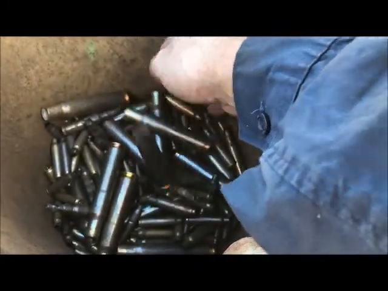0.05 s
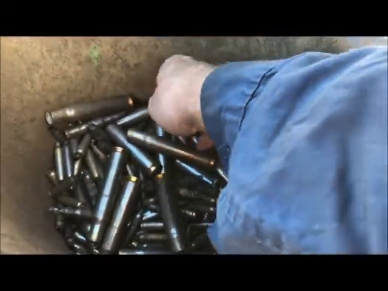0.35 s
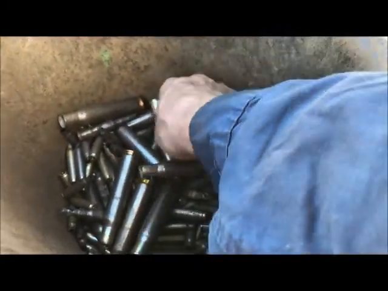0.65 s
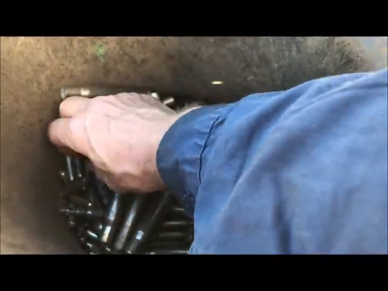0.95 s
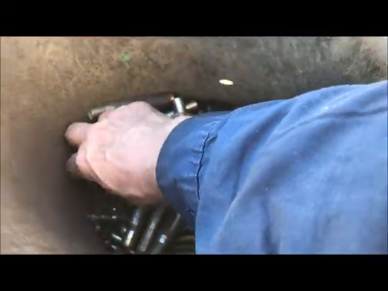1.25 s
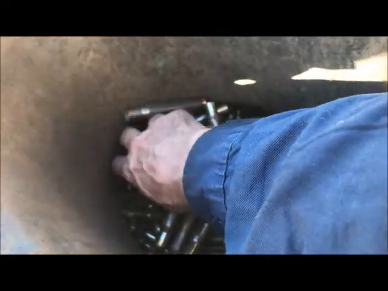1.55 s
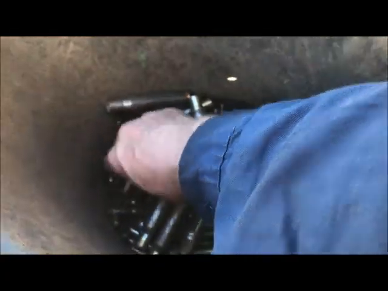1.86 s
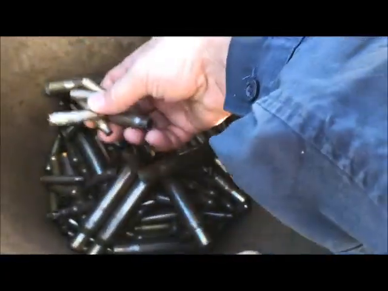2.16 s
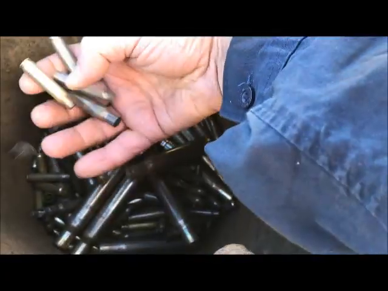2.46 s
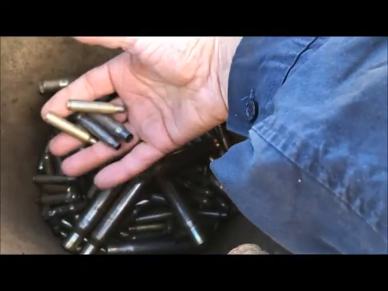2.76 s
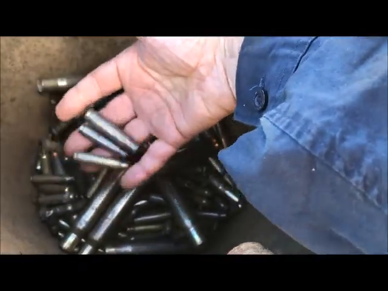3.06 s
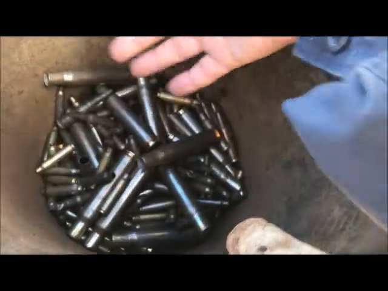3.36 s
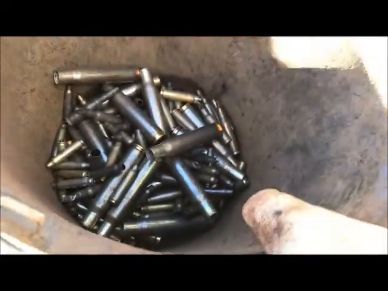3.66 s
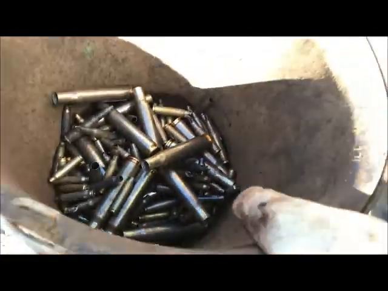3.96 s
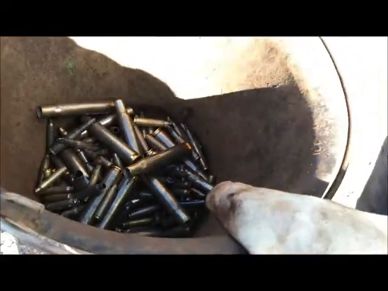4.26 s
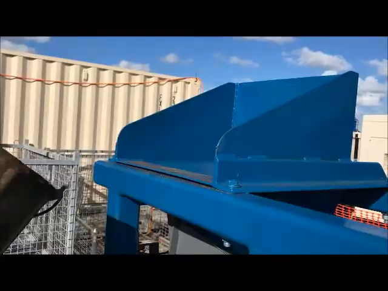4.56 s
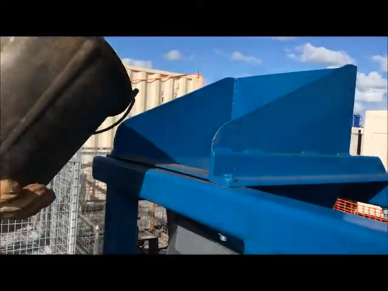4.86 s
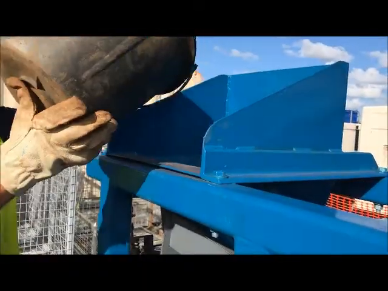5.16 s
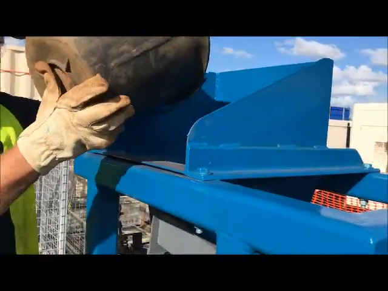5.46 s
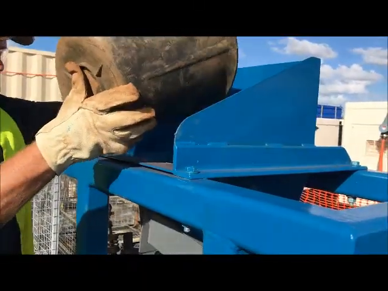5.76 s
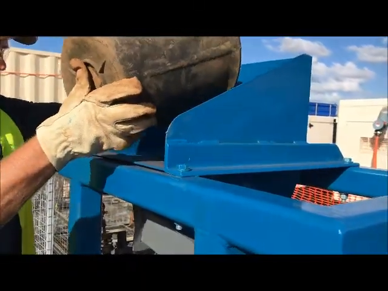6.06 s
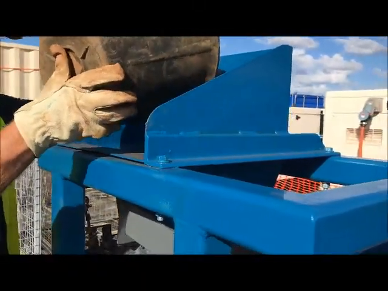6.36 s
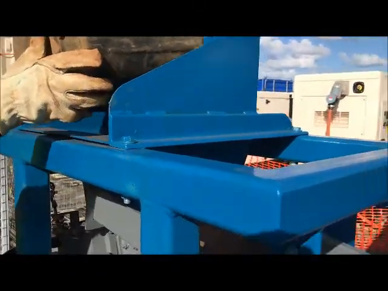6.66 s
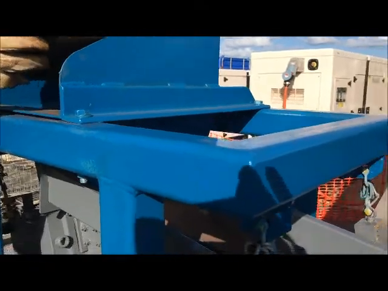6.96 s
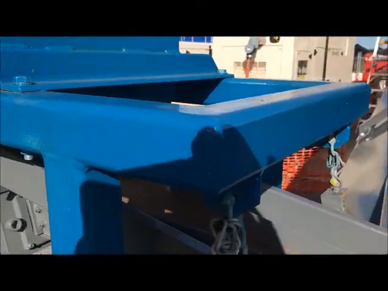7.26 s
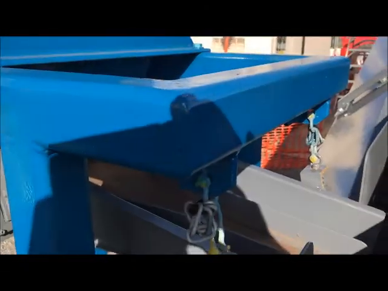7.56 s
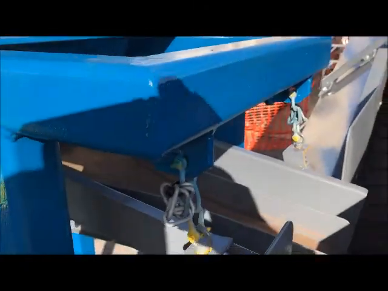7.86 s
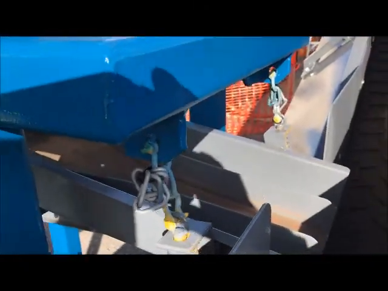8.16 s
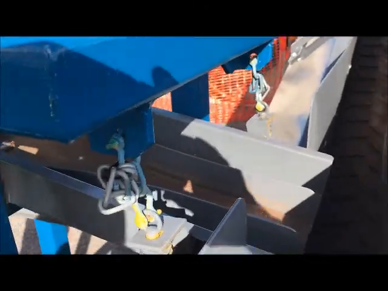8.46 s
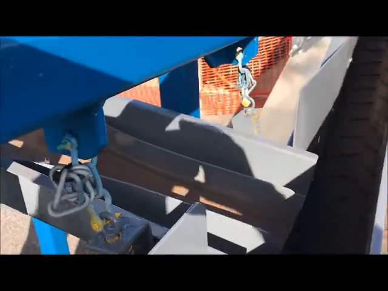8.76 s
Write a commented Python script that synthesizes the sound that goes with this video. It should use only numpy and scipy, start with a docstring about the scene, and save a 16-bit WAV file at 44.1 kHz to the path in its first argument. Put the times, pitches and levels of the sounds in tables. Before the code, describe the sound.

Empty brass casings jingle and scrape as a hand stirs them near the microphone, with hollow bumps from the plastic bucket. Several fall back and ring, leaving only a low generator hum outdoors. The sound cuts abruptly to a nearby shredder, droning with a thin motor whine. Casings slide in with a light jingle, and toward the conveyor, rattling rises and a run of sharp metallic cracks follows.

```python
"""Spent brass casings clink and sing in a plastic bucket as a hand rummages and lets a few drop back. Their
knocks carry into the bucket wall and floor; a generator hums behind. Then the scene changes: after a brief
silent gap a shredder drones close by, its drive shaking the steel frame. As the microphone moves from hopper to
conveyor, casings slide in and the first ones crack in the cutters. A limiter ducks the background after the
loudest clinks."""
import sys
import numpy as np
from scipy import signal
from scipy.fft import rfft, irfft
from scipy.io import wavfile
from scipy.ndimage import uniform_filter1d, minimum_filter1d

SR = 44100
rng = np.random.default_rng(int(sys.argv[2]) if len(sys.argv) > 2 else 0)


def dump_mix(stems):
    """Bounce the given channels to the path in sys.argv[1] as a 16-bit WAV at rate SR."""
    frames = np.atleast_2d(stems).T  # one column per channel
    limited = np.clip(frames, -1, 1)  # hard clip at full scale
    pcm = np.round(limited * 32767).astype(np.int16)
    wavfile.write(sys.argv[1], SR, pcm)


N = 396900
TIME = np.arange(N) / SR
SILENCE_FROM_S, SILENCE_TO_S = 4.628, 4.674


def amp(db):
    return 10 ** (np.asarray(db) / 20)


def unit_rms(x):
    return x / np.sqrt(np.mean(x ** 2) + 1e-20)


def curve(rows, column=1):
    """One column of a time table, sample by sample."""
    rows = np.array(rows)
    return np.interp(TIME, rows[:, 0], rows[:, column])


def add(mix, start_s, sound):
    part = mix[max(round(start_s * SR), 0):][:len(sound)]
    part += sound[:len(part)]


def fade(t60, size):
    """Exponential decay that loses 60 dB in t60 seconds."""
    return np.exp(-np.log(1000) * TIME[:size] / t60)


def noise(spectrum, size=N):
    """Noise of rms 1, coloured by rows of freq_hz, level_db."""
    hz, db = np.transpose(spectrum)
    gain = amp(np.interp(np.log(np.fft.rfftfreq(size, 1 / SR) + 1), np.log(hz), db))
    return unit_rms(irfft(rfft(rng.standard_normal(size)) * gain, size))


def drift(rate_hz):
    """A random wander of rms 1, with up to about rate_hz changes a second."""
    hz = np.arange(0, 3 * rate_hz, SR / N)
    real, imag = np.random.default_rng(rng.integers(2 ** 31)).standard_normal((len(hz), 2)).T
    return unit_rms(irfft((real + 1j * imag) * np.exp(-(hz / rate_hz) ** 2), N))


def ring(modes, detune, uneven_db, damping=1, count=2, size=8000):
    """Like objects struck at random spots; damping divides their ring times; rms 1 over the first 10 ms."""
    hz, db, t60 = np.tile(np.transpose(modes), count)[:, :, None]
    pitch, strength, phase = rng.standard_normal((3, len(hz), 1))
    waves = np.sin(2 * np.pi * (hz * (1 + detune * pitch) * TIME[:size] + phase))
    sound = (amp(db + uneven_db * strength) * fade(t60 / damping, size) * waves).sum(0)
    return sound / np.std(sound[:SR // 100])


def patter(contacts, per_s, spread_db):
    """Plays the given contact sounds at random moments and strengths; rms 1."""
    strengths = amp(spread_db * np.minimum(rng.exponential(1, N), 2))
    which, out = rng.integers(0, len(contacts), N), np.zeros(N)
    for at in np.flatnonzero(rng.random(N) < per_s / SR):
        add(out, at / SR, strengths[at] * contacts[which[at]])
    return unit_rms(out)


# hum of the generator, behind the bucket: pitch_hz, level_db
GENERATOR_TONES = [(50.3, -31.5), (75.4, -36.5), (150.8, -30.5), (1205, -54.5)]
# the rumble under it: freq_hz, level_db
RUMBLE_SPECTRUM = [(25, -26), (55, -4.5), (245, -4), (405, -22.5), (1190, -25), (2000, -31), (7100, -46.5),
                   (15000, -59.5)]
def generator(rumble_db=-27):
    """Engine and alternator tones waver slightly over a low rumble."""
    clock = TIME + 0.0005 * drift(0.88)
    hum = sum(amp(db + 1.1 * drift(6.4)) * np.sin(2 * np.pi * (hz * clock + rng.random()))
              for hz, db in GENERATOR_TONES)
    return np.sqrt(2) * hum + amp(rumble_db + 0.78 * drift(5.0)) * noise(RUMBLE_SPECTRUM)


# brass on brass, at the point of contact: freq_hz, level_db
SNAP_SPECTRUM = [(400, -13), (1000, -3), (2000, 6), (4000, 9), (8000, 6), (10500, 1.5), (16000, -5)]
def snap(t60=0.012, echo_db=-12, echo_t60=0.05, size=8000):
    """The dry snap of two casings, with its quick echoes between the walls around them."""
    return noise(SNAP_SPECTRUM, size) * (fade(t60, size) + amp(echo_db) * fade(echo_t60, size))


# one brass casing in the pile: pitch_hz, level_db, t60_s
CASING_MODES = [(5050, 0, 0.056), (6560, 3, 0.071), (9400, 0, 0.06), (11330, -4, 0.1), (11940, 0, 0.05),
                (13080, -4, 0.08), (14330, 0, 0.06), (15350, 2, 0.05)]
# the bucket wall and the air inside: pitch_hz, level_db, t60_s
BUCKET_MODES = [(293.3, 2.5, 0.083), (634, -5, 0.078), (917, 3.5, 0.034), (1051, 4, 0.0312),
                (1274, -2, 0.038), (1410, -6, 0.07)]
def jingle(per_s, spread_db, snap_db, wall_db, detune, damping, uneven_db):
    """Loose casings of slightly different sizes touch at random; each rings, snaps and stirs the wall."""
    contacts = [ring(CASING_MODES, detune, uneven_db, damping, count=1)
                + amp(snap_db) * snap()
                + amp(wall_db) * ring(BUCKET_MODES, detune=0.087, uneven_db=-1.5) for _ in range(24)]
    return patter(contacts, per_s, spread_db)


# air in an open casing: pitch_hz, level_db, t60_s
HOLLOW_MODES = [(1920, 3.5, 0.02), (3360, 6, 0.018)]
def scraping(snap_db=2, hollow_db=-1, wall_db=-2, size=3000):
    """Casings pressed together in the hand slip over each other: damped, hollow ticks of many pitches."""
    ticks = [ring(CASING_MODES, detune=0.078, uneven_db=5, damping=1.3, count=1, size=size)
             + amp(snap_db) * snap(size=size)
             + amp(hollow_db) * ring(HOLLOW_MODES, detune=0.25, uneven_db=2, count=1, size=size)
             + amp(wall_db) * ring(BUCKET_MODES, detune=0.073, uneven_db=1, count=1, size=size)
             for _ in range(40)]
    return patter(ticks, per_s=420, spread_db=6)


# the hand, down in the bucket: start_s, length_s, effort_db, grip_share
HAND_STROKES = [(0.119, 0.13, -9, 0.04), (0.372, 0.21, -21, 0.07), (0.965, 0.04, -24, 0.44),
                (1.046, 0.091, -15.5, 0.13), (1.34, 0.13, -21.5, 0.56), (1.559, 0.21, -26, 0.34),
                (1.702, 0.074, -22, 0.84), (1.909, 0.2, -24, 0.17), (2.308, 0.21, -33, 0),
                (2.692, 0.041, -31.5, 0.7), (3.312, 0.12, -29, 0.45)]
def rummaging(attack_s=0.026, settle_db_per_s=102):
    """Each stroke swells, holds and settles; loose casings jingle and gripped ones scrape."""
    loose, gripped = np.zeros((2, N))
    t = TIME[:SR]
    for start_s, length_s, effort_db, grip_share in HAND_STROKES:
        settling_db = settle_db_per_s * np.maximum(t - length_s, 0)
        power = (np.minimum(t / attack_s, 1) * amp(effort_db - settling_db)) ** 2
        add(loose, start_s, (1 - grip_share) * power)
        add(gripped, start_s, grip_share * power)
    jingling = jingle(per_s=140, spread_db=8, snap_db=0, wall_db=-3.5,
                      detune=0.014, damping=0.68, uneven_db=6)
    return np.sqrt(loose) * jingling + np.sqrt(gripped) * scraping()


# clearest modes of free casings, named by casing shape and mode number: mode_name, pitch_hz
FREE_MODE_HZ = {"wide 1": 5021, "wide 2": 9882, "wide 3": 11187, "wide 4": 15520, "slim 1": 6550, "slim 2":
                9399, "slim 3": 11940, "slim 4": 13115, "small 1": 7224, "small 2": 7693, "small 3": 11380,
                "small 4": 12850, "long 1": 6245, "long 2": 8807, "short 1": 5582}
# casings tumbling free in the bucket, the last at the shredder: start_s, length_s, mode_name, level_db
TUMBLES = [(0.132, 0.28, "slim 1", -2), (0.143, 0.11, "slim 3", -4.5), (0.124, .13, "slim 2", -15),
           (0.548, 0.024, "wide 1", -8), (0.58, 0.085, "slim 1", -14.5), (0.581, 0.084, "slim 2", -14.5),
           (0.688, 0.0052, "long 1", -6.5), (0.686, 0.055, "long 2", -21), (0.695, 0.04, "wide 4", -18),
           (.692, 0.32, "slim 4", -22), (0.696, 0.35, "wide 2", -28), (0.851, 0.026, "short 1", -30.5),
           (1.1, 0.053, "slim 1", -12), (1.415, 0.084, "small 1", -22.5), (1.577, 0.13, "small 4", -19),
           (1.634, 0.036, "small 2", -22), (1.736, 0.015, "wide 1", -20.5), (1.813, .16, "small 4", -19),
           (1.897, .07, "wide 2", -16.5), (2.334, 0.26, "wide 4", -12), (2.417, .2, "small 3", -20),
           (2.478, 0.068, "wide 1", -27.5), (2.64, .1, "slim 4", -14.5), (2.717, 0.022, "wide 1", -4.5),
           (2.733, .3, "wide 3", -21), (3.044, 0.059, "wide 4", -18), (3.255, 0.21, "wide 4", -9.5),
           (3.3, 0.061, "wide 1", -11), (3.303, 0.24, "wide 3", -4), (3.409, 0.024, "wide 1", 11),
           (3.435, 0.076, "wide 1", -5), (8.153, 0.24, "slim 1", -15.5)]
def singing(rise_s=0.0015, stop_s=0.011, twin_db=-20, min_split_hz=26):
    """Free casings ring until the pile stops them; slightly out of round, each mode beats with a twin."""
    out, t = np.zeros(N), TIME[:SR]
    for start_s, length_s, mode_name, level_db in TUMBLES:
        hz, clock = FREE_MODE_HZ[mode_name], t + round(start_s * SR) / SR
        t60 = 0.59 * (10000 / hz) ** 0.78  # higher modes die sooner
        twin_hz = hz + min_split_hz * (1 + rng.random())
        pair = np.sin(2 * np.pi * hz * clock) + amp(twin_db) * np.sin(2 * np.pi * twin_hz * clock)
        envelope = (1 - np.exp(-t / rise_s)) * np.exp(-np.maximum(t - length_s, 0) / stop_s)
        add(out, start_s, amp(level_db) * fade(t60, len(t)) * envelope * pair)
    return out


def chatter(sound, gap_s=0.003, loss_db=4.5, count=4):
    """The casings rebound and touch again a few times, ever more lightly."""
    rebounds = np.zeros(len(sound))
    delays = np.cumsum(gap_s * (0.5 + rng.exponential(1, count)))
    for k, delay_s in enumerate(delays):
        add(rebounds, delay_s, amp(-loss_db * (k + 2)) * sound)
    return sound + rebounds


# casings knocking together in the bucket: start_s, snap_db, ring_db
KNOCKS = [(0.128, -1, -4.5), (0.148, -8, -10), (0.1589, -6, -1.5), (0.188, -2, -2.5), (0.471, -5, -12),
          (0.536, -15, -9.5), (0.5801, -15, -18), (0.6858, -8, -12), (0.734, -15, -25), (0.766, -16, -47),
          (0.9747, -17, -41), (1.003, -17, -28), (1.06, -10, -16), (1.087, -15, -6.5), (1.315, -19, -26),
          (1.3696, -22, -11), (1.414, -13.5, -12.5), (1.53, -14, -20), (1.66, -13.5, -27),
          (1.716, -12, -10.5), (1.741, -15, -12), (1.786, -7.5, -15), (1.875, -16.5, -15.5),
          (1.9754, -12, -24), (2.067, -20, -18), (2.2982, -17.5, -10), (2.330, -12, -9), (2.421, -23, -22),
          (2.4554, -15.5, -15.5), (2.633, -21, -16.5), (2.672, -13.5, -24), (2.701, -9.5, -13),
          (2.7149, -11.5, -6.5), (2.7394, -8, -8), (2.857, -22, -38), (2.892, -21, -21.5),
          (3.004, -26, -23), (3.052, -29, -29), (3.257, -8, -22), (3.2948, -7, -8.5), (3.353, -13.5, -17),
          (3.374, -8, -7), (3.41, -3.5, -4), (3.492, -22, -10)]
def clinks(direct_db=-2.5, wall_db=-9, spread_s=0.001, damping=0.78):
    """Each knock snaps, rings the casings that meet, and reaches the bucket wall through the pile."""
    out = np.zeros(N)
    for start_s, snap_db, ring_db in KNOCKS:
        low_db = 3 + 0.6 * ring_db  # soft knocks ring thinner
        low = amp(low_db) * ring(CASING_MODES[:3], detune=0.012, uneven_db=3, damping=damping)
        high = ring(CASING_MODES[3:], detune=0.009, uneven_db=5, damping=damping)
        wall = amp(snap_db + wall_db) * ring(BUCKET_MODES, detune=0.069, uneven_db=0)
        ringing = amp(ring_db) * (low + high) + wall
        # the blow takes a moment to spread through neighbouring casings
        ringing *= 1 - np.exp(-TIME[:len(ringing)] / spread_s)
        add(out, start_s, chatter(amp(snap_db + direct_db) * snap() + ringing / np.sqrt(2)))
    return out


# the pile against the bucket: start_s, wall_db, floor_db
PILE_BUMPS = [(.158, -8.5, -30), (0.187, -4, 8), (0.299, -10.5, -6.5), (0.425, -12.5, -10),
              (1.09, -19, -32), (1.13, -12, -26), (3.304, -18.5, -11.5), (3.375, -29, -13)]
def bumps(floor_hz=292, floor_t60=0.1):
    """The shifting pile knocks on the bucket wall and thumps its floor."""
    out = np.zeros(N)
    thump = fade(floor_t60, SR) * np.sin(2 * np.pi * floor_hz * TIME[:SR])
    for start_s, wall_db, floor_db in PILE_BUMPS:
        wall = ring(BUCKET_MODES, detune=0.13, uneven_db=3.5) / np.sqrt(2)
        add(out, start_s, chatter(amp(wall_db) * wall))
        add(out, start_s, amp(floor_db) * thump)
    return out


def resonances(rows):
    """Narrow resonances shaken at random: each swells, dips and wanders in pitch."""
    return sum(amp(db) * (drift(width_hz) * np.sin(2 * np.pi * hz * TIME)
                          + drift(width_hz) * np.cos(2 * np.pi * hz * TIME))
               for hz, width_hz, db in rows)


def churning(x, drive_hz, likeness=0.4):
    """Each turn of the shaft, three beats of the drive long, partly repeats the two turns before."""
    turn_samples = round(3 * SR / drive_hz)
    return unit_rms(sum(likeness ** k * np.roll(x, k * turn_samples) for k in range(3)))


def steel_frame(x, wet, t60=0.088, size=6000):
    """The steel frame answers with countless close resonances."""
    tail = rng.standard_normal(size) * fade(t60, size)
    answer = signal.oaconvolve(x, tail / np.linalg.norm(tail))[:N]
    return (x + wet * answer) / np.hypot(1, wet)


# the shredder close by, microphone moving from hopper to conveyor: time_s, drone_db, tones_db, rattle_db
MICROPHONE_PATH = [(4.7, -1, -15.5, -39), (6.85, 0.4, -27, -34.5), (7.15, -0.5, -23, -25.5),
                   (7.7, 0.5, -27, -25), (8.05, -0.5, -33, -29.5), (8.25, -7.5, -38.5, -26.5),
                   (9, -4.5, -39, -27)]
# tones of the drive along that path: harmonic, level_db, change_db_per_s
DRIVE_TONES = [(1, -13, 1.5), (5, -6, -0.5), (7, -13, 0), (10, -6, 3), (19, -14.5, 4.5)]
# high whine of the electric motor: pitch_hz, width_hz, level_db
MOTOR_WHINE = [(14270, 25, -33), (14480, 260, -31), (15220, 30, -37), (15180, 380, -32)]
# roar of the machine: freq_hz, level_db
ROAR_SPECTRUM = [(25, -29), (55, -6), (173, -10), (267, -6.5), (421, -4.5), (457, -12.5), (537, -2),
                 (684, -3.5), (871, -1), (1200, -8), (2560, -17), (7000, -21), (10600, -27.5), (15500, -30)]
# rattle at the conveyor: freq_hz, level_db
CONVEYOR_SPECTRUM = [(600, -21), (1000, 1), (1700, 2), (2700, -10.5), (3600, -7), (8000, -22)]
# ringing steel panels: pitch_hz, width_hz, level_db
PANEL_MODES = [(322.5, 7.4, -27), (585, 4.2, -30.5), (864, 11.5, -26.5), (894, 6.4, -30), (960, 6.1, -27.5),
               (3910, 113, -37)]
def shredder(drive_hz=53.66, roar_db=-17, throb_depth=0.076, tick_db=-39, waver_db=2.2):
    """The drive shakes the frame: tones, ringing panels, whine, rattle, ticks and a churning roar."""
    drone_gain, tone_gain, rattle_gain = (amp(curve(MICROPHONE_PATH, column)) for column in (1, 2, 3))
    beats = drive_hz * (TIME + 0.00015 * drift(2.4))
    tones = np.zeros(N)
    for harmonic, level_db, change_db_per_s in DRIVE_TONES:
        gain = amp(level_db + change_db_per_s * (TIME - SILENCE_TO_S) + waver_db * drift(38))
        tones += gain * np.sin(2 * np.pi * (harmonic * beats + rng.random()))
    whine = resonances(MOTOR_WHINE) * amp(2 * drift(22))
    roar = amp(roar_db + 0.5 * drift(16)) * churning(noise(ROAR_SPECTRUM), drive_hz)
    low_roar = signal.sosfiltfilt(signal.butter(2, 1400, fs=SR, output="sos"), roar)
    # only the upper part of the roar throbs, once and three times a beat
    throb = 1 + throb_depth * (np.cos(2 * np.pi * beats) + np.cos(6 * np.pi * beats) / np.sqrt(2))
    tick_envelope = np.exp(-(beats % 1) / 0.026) * amp(1.9 * drift(29))
    ticks = unit_rms(tick_envelope * noise([(5000, -14), (11000, 0)]))
    rattle = steel_frame(noise(CONVEYOR_SPECTRUM) * amp(2 * drift(48)), wet=0.7)
    panels = resonances(PANEL_MODES)
    high_roar = steel_frame(roar - low_roar, wet=0.53) * throb
    drone = low_roar + high_roar + panels + whine + amp(tick_db) * ticks
    return np.sqrt(2) * tone_gain * tones + drone_gain * drone + rattle_gain * rattle


# the stream of casings in the hopper: time_s, level_db
HOPPER_FLOW = [(5.4, -66), (5.7, -32.5), (6.4, -27.5), (7.15, -27.5), (7.5, -31), (8.4, -38)]
def pouring():
    """Casings jingle against each other as they slide down the hopper."""
    return amp(curve(HOPPER_FLOW)) * jingle(per_s=82, spread_db=5.5, snap_db=9, wall_db=0,
                                            detune=0.012, damping=0.7, uneven_db=4)


# a bursting casing: freq_hz, level_db
CRACK_SPECTRUM = [(500, -28), (1200, 4), (2500, 3.5), (6000, 3), (10000, -6), (15000, -12)]
# the steel chamber around it: freq_hz, level_db
CHAMBER_SPECTRUM = [(300, -44), (650, 1), (1000, 7), (2300, -6), (5000, -23)]
# the ringing cutters: pitch_hz, level_db, t60_s
CUTTER_MODES = [(1020, -10, 0.12), (3410, 16, 0.07)]
# casings caught inside the shredder: start_s, crack_db, chamber_db
CUTTER_BITES = [(8.059, -11, -7), (8.082, -2.5, -7), (8.099, -3.5, -8.5), (8.167, -6, -9), (8.300, -9, -13),
                (8.452, -5, -16.5), (8.612, -18.5, -31), (8.936, -14, -11.5), (8.962, -4, -22)]
def cracks(crack_t60=0.063, chamber_t60=0.38, ring_db=-12, size=12000):
    """A casing bursts between the cutters; they ring and the steel chamber clangs."""
    out = np.zeros(N)
    for start_s, crack_db, chamber_db in CUTTER_BITES:
        burst = noise(CRACK_SPECTRUM, size) * fade(crack_t60, size)
        clang = noise(CHAMBER_SPECTRUM, size) * fade(chamber_t60, size)
        cutters = ring(CUTTER_MODES, detune=0.0305, uneven_db=0, count=3, size=size)
        add(out, start_s, amp(crack_db) * (burst + amp(ring_db) * cutters) + amp(chamber_db) * clang)
    return steel_frame(out, wet=1.0)


def scene():
    """Two scenes one after the other, with a brief silent gap between: first at the bucket, then close to the
    shredder."""
    at_bucket = clinks() + bumps() + rummaging() + generator()
    at_shredder = pouring() + shredder() + cracks()
    return (at_bucket * (TIME < SILENCE_FROM_S) + at_shredder * (TIME > SILENCE_TO_S) + singing())[None]


def record(dry, ceiling_db=1.0, recover_db_per_s=21, cutoff_hz=15850):
    """After the microphone, a peak limiter clamps at once and recovers slowly; then a steep low-pass."""
    over_db = np.maximum(20 * np.log10(abs(dry[0]) + 1e-9) - ceiling_db, 0)
    recovery_db = recover_db_per_s * TIME
    held_db = np.maximum.accumulate(over_db + recovery_db) - recovery_db
    gain_db = uniform_filter1d(minimum_filter1d(-held_db, size=65), size=65)
    low_pass = signal.firwin(401, cutoff_hz, window=("kaiser", 9), fs=SR)
    return signal.oaconvolve(dry * amp(gain_db), low_pass[None], "same")


dry = scene()
out = record(dry)
dump_mix(out)
```